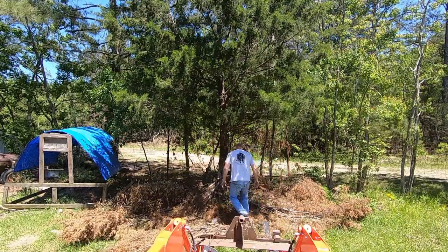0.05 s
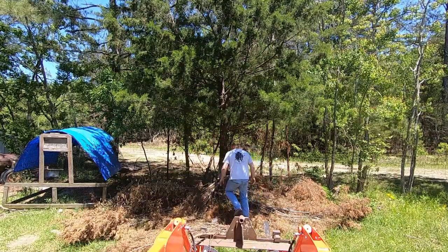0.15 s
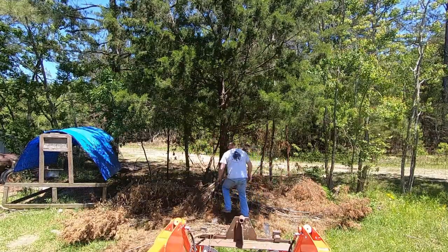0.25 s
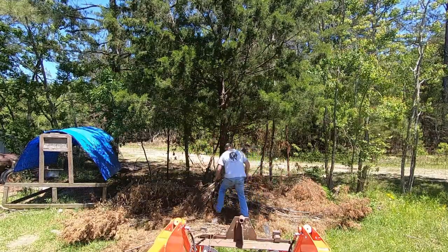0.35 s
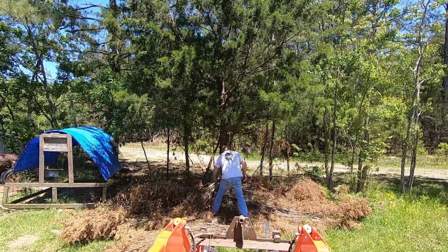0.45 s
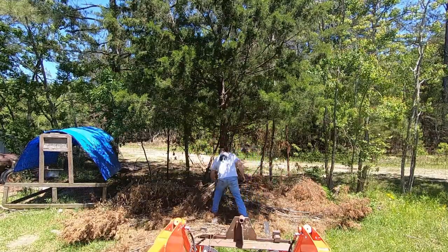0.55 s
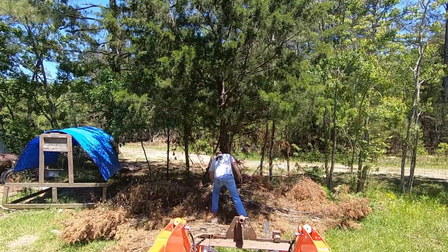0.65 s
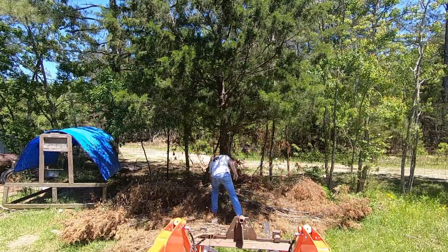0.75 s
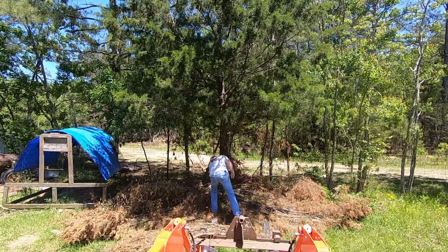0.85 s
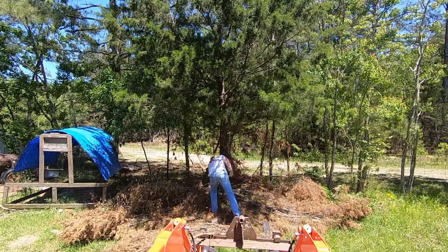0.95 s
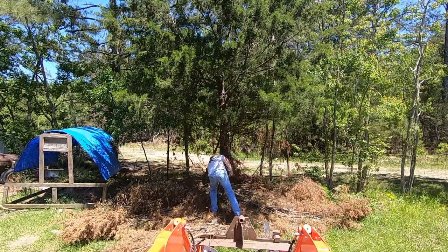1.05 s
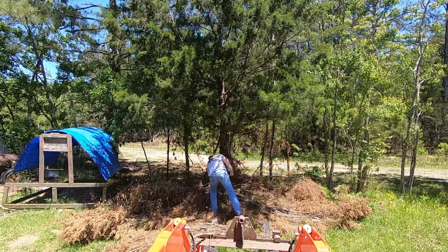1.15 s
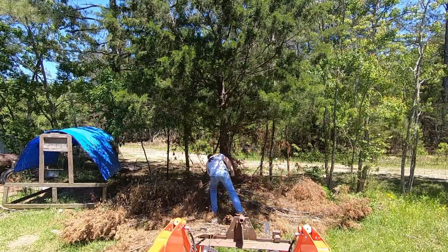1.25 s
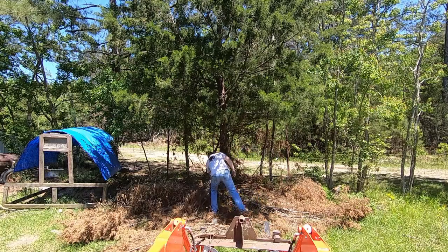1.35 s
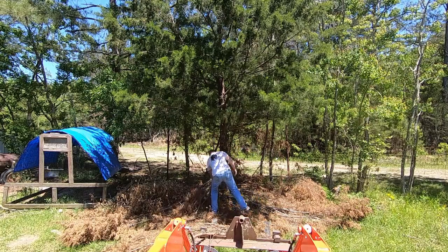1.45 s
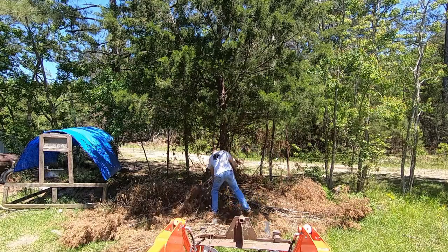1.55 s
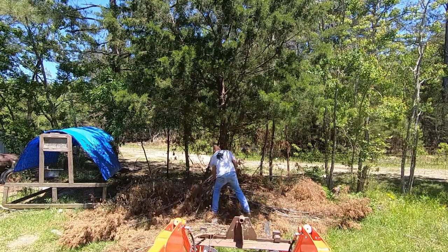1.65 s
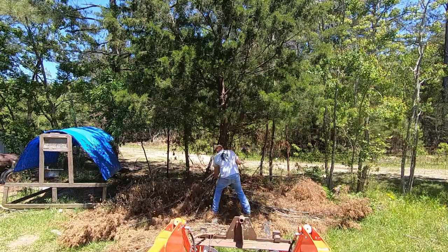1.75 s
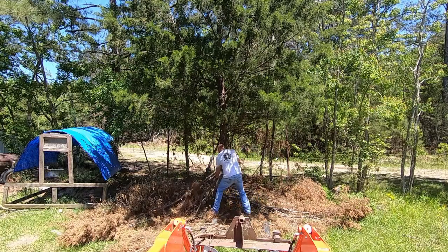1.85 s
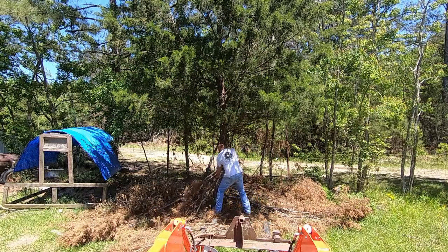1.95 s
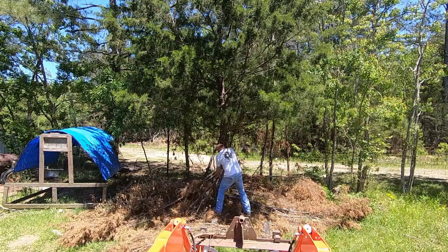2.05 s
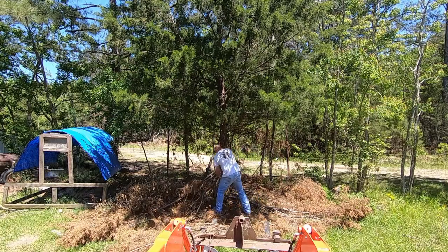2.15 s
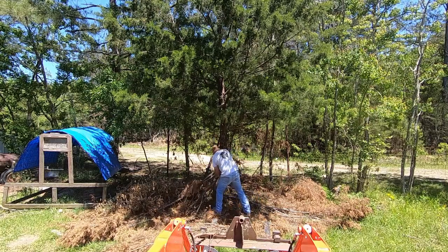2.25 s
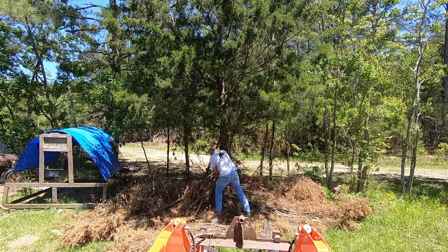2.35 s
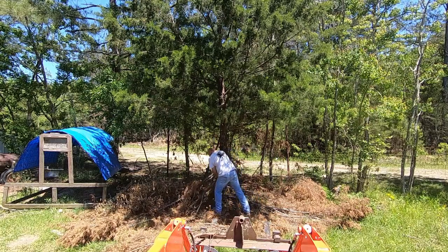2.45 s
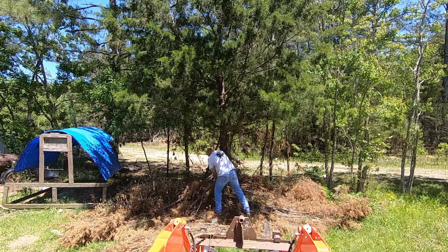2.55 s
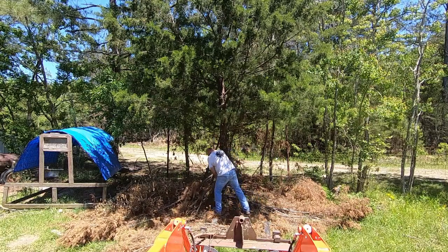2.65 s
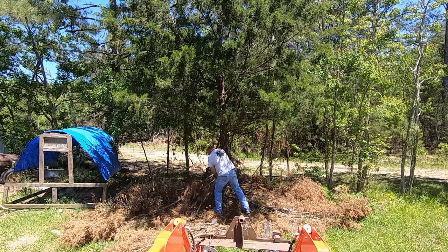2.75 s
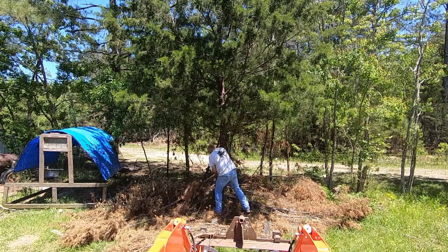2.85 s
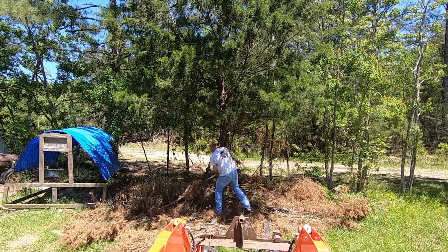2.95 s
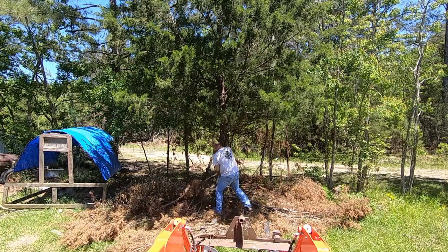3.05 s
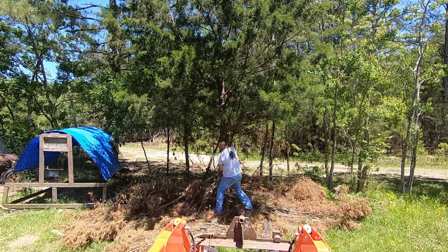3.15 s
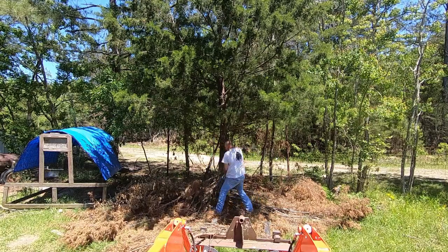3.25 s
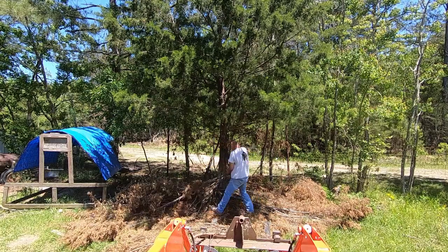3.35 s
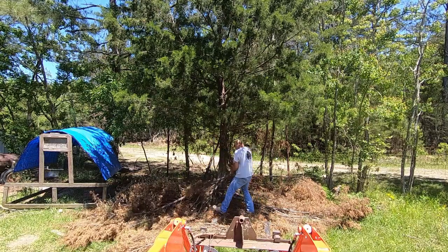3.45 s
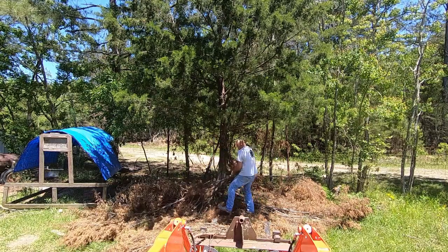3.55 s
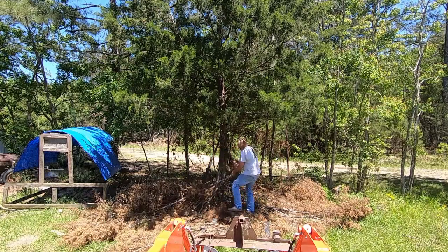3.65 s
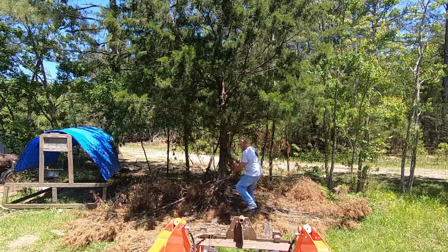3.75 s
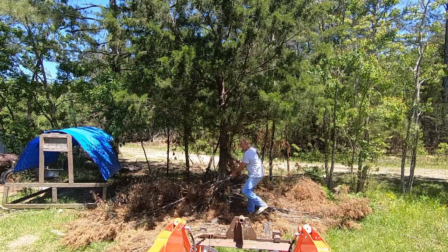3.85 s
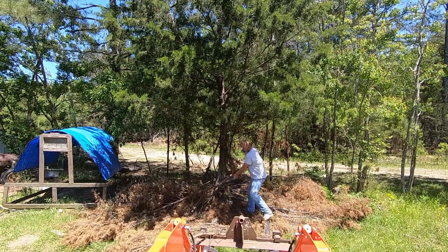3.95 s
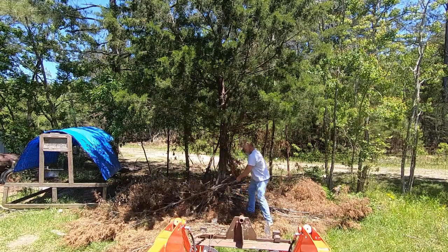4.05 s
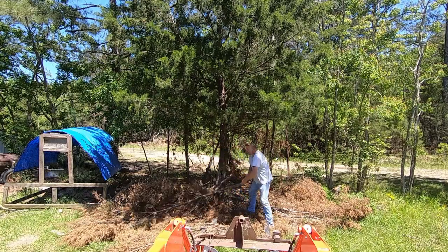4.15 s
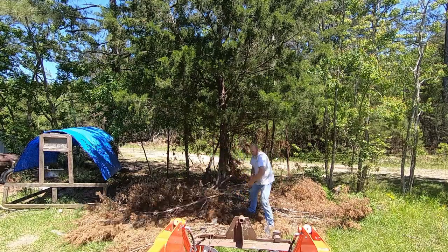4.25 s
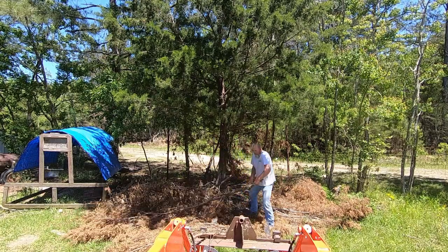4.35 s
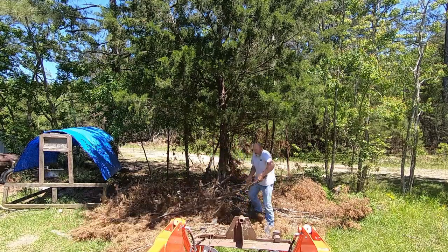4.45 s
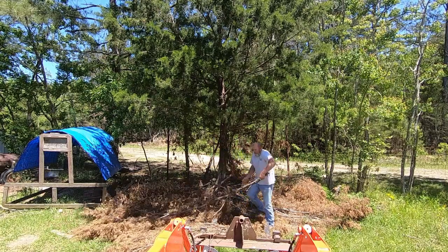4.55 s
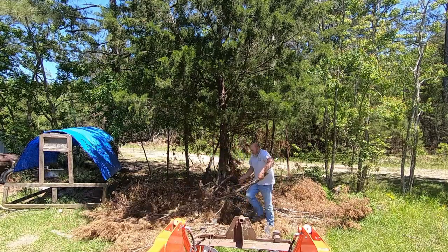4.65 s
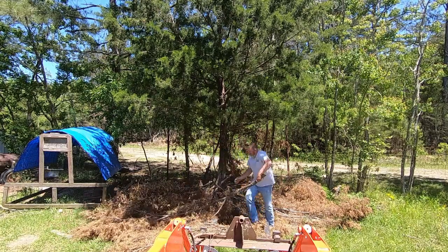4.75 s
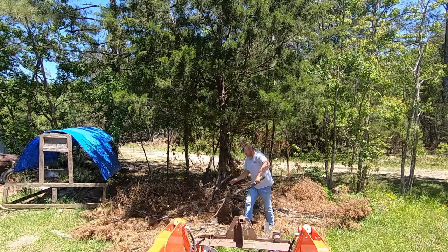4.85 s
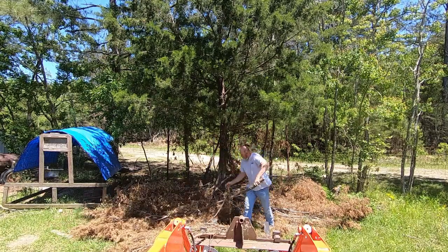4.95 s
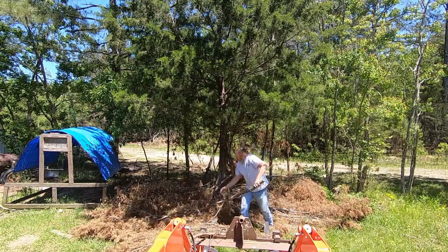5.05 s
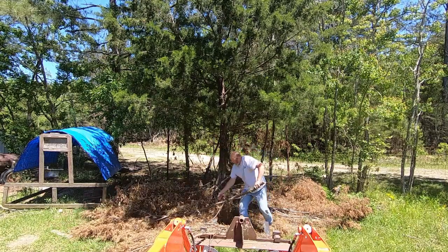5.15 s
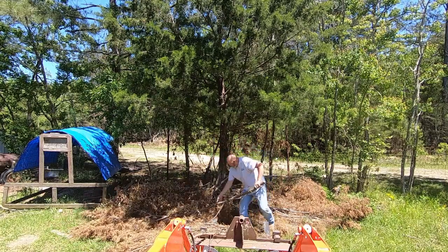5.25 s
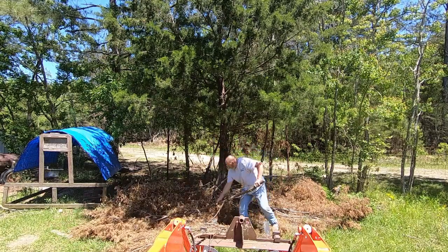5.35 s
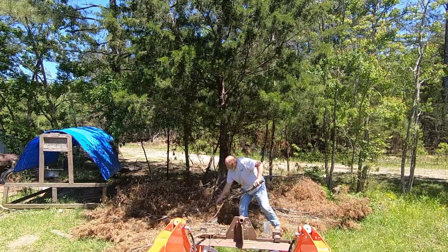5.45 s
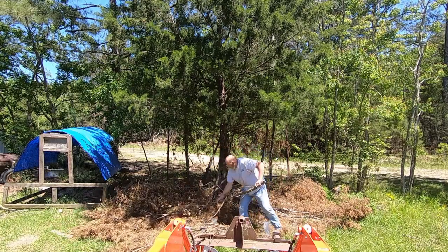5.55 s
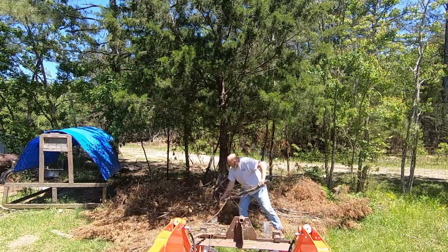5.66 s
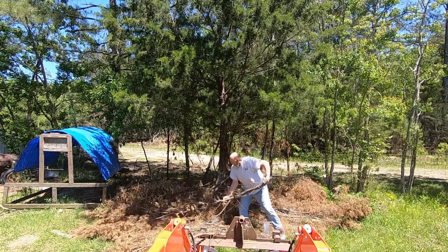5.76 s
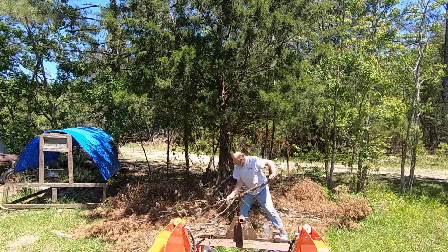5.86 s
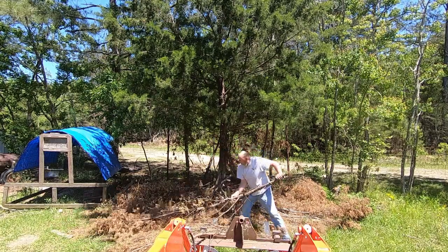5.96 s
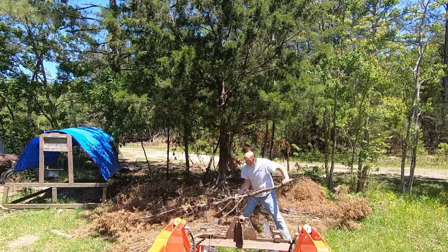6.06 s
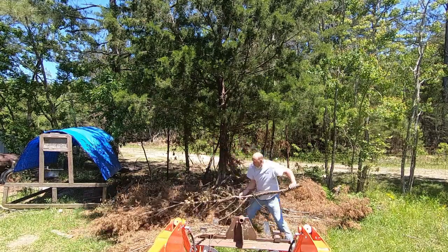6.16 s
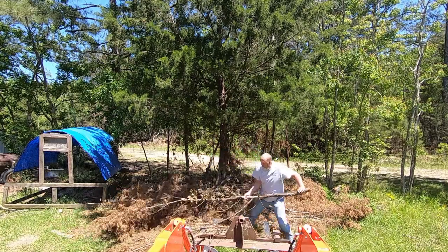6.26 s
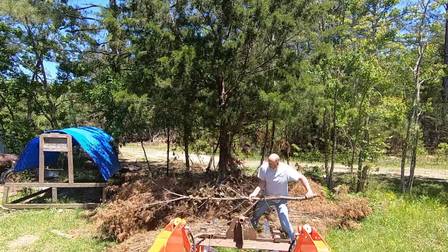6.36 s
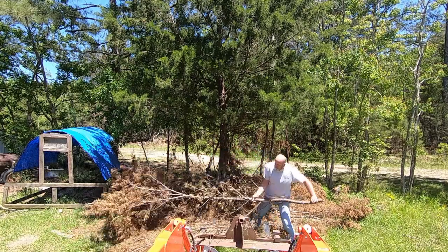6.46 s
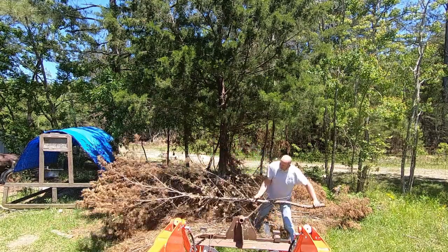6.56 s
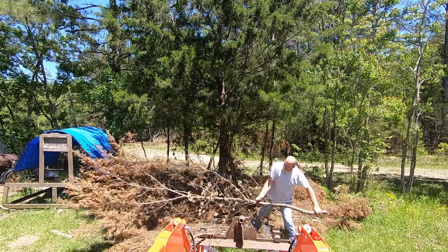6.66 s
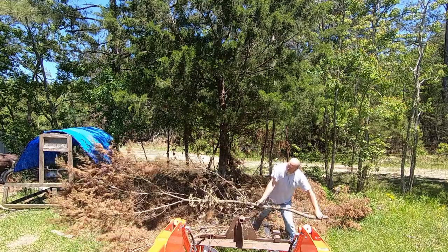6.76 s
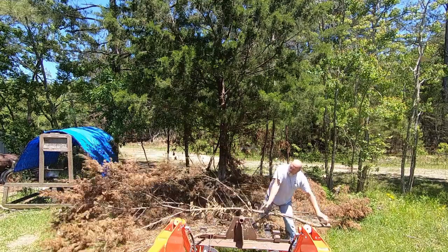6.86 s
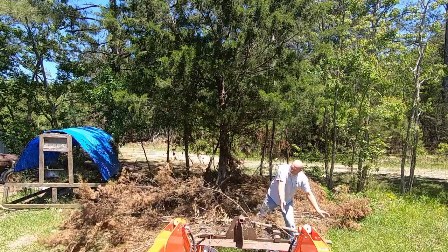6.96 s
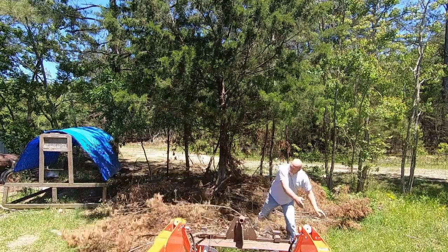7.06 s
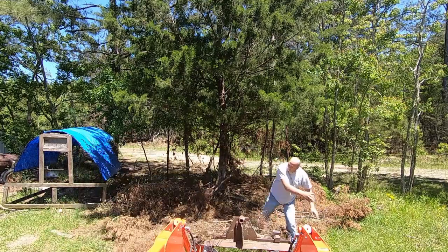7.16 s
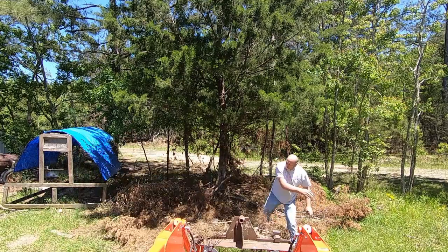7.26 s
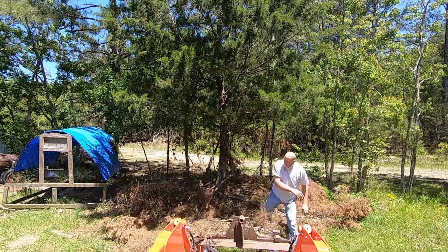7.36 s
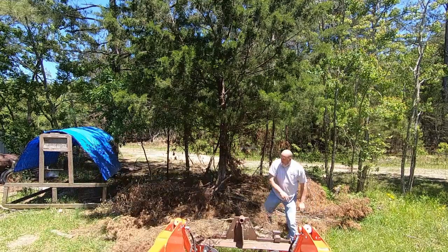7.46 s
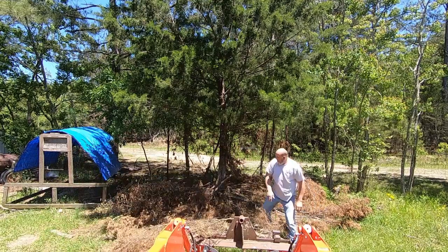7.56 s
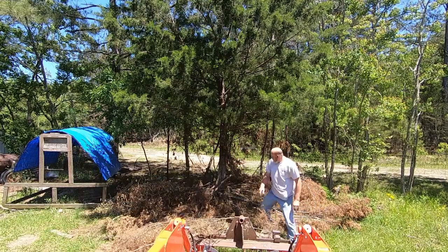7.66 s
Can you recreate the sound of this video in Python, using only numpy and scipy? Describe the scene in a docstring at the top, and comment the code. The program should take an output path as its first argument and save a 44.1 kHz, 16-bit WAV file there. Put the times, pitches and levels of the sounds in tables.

```python
"""A springy mount under a camera sways and rumbles throughout (low sines, coloured noise), over faint air noise.
From the start needled branches are dragged off a brush pile in pulls (needles and sticks: filtered clicks and noise),
with twig snaps and, up to 5 s, boot thuds (noise bursts). A far bird calls at 0.5-0.9 s (swept sines with echoes).
A branch knocks the steel frame at 6.0 s, lightly at 6.7 s and again at 7.15 s (decaying modes, bark noise).
The mount's joint pops from 6.2 s (pushed resonances) and squeaks at 7.4 s (three partials)."""
import sys
import numpy as np
from scipy import signal
from scipy.fft import rfft, irfft, next_fast_len
from scipy.io import wavfile
from scipy.ndimage import uniform_filter1d

SR = 44100
rng = np.random.default_rng(int(sys.argv[2]) if len(sys.argv) > 2 else 0)


def int16_out(signal):
    """Quantize to a 16-bit WAV file."""
    q = np.round(np.clip(np.atleast_2d(signal).T, -1, 1) * 32767)
    wavfile.write(sys.argv[1], SR, q.astype(np.int16))


N = 340525
T = np.arange(N) / SR

# air noise spectrum: f/Hz, relative density/dB
AIR_SHAPE = [(35, -39), (60, -18), (71, -18), (152, -8.5), (299, -9), (433, -10), (1210, -25), (2480, -18),
             (6140, -22), (9560, -54), (15600, -47)]
AIR_DB = -75.5

# bird notes: start t/s, length/s, first f/Hz, last f/Hz, warble depth/Hz, level/dB
BIRD_NOTES = [(.46, 0.08, 3900, 4070, 200, -66), (0.534, 0.061, 3950, 3190, 80, -60),
              (0.584, 0.056, 3700, 2740, 150, -62), (0.637, 0.062, 3500, 2730, 200, -65),
              (0.686, 0.052, 3500, 2914, 200, -64), (0.742, 0.062, 3450, 2950, 200, -68),
              (.80, .07, 3280, 3220, 60, -71)]
WARBLE_HZ = 69
WOOD_T60_S, WOOD_WET_DB = 0.96, 1.5

# footfalls on litter: t/s, peak level/dB, pitch f/Hz
FOOTFALLS = [(0.088, -56, 277), (0.705, -56, 221), (1.371, -59, 223), (1.991, -65, 221), (2.994, -50, 525),
             (4.258, -41, 598), (4.927, -54, 307), (5.039, -55, 409)]

# mount motion, before random wander: t/s, sway level/dB, shaking level/dB, rumble level/dB
MOUNT_LEVELS = [(0.05, -34, -45, -68), (0.15, -29, -47.5, -61), (0.32, -34.5, -57, -70),
                (0.73, -29.5, -57, -61), (0.81, -29.5, -56, -69), (1.15, -42, -57, -70.5),
                (1.47, -39, -73, -72.5), (1.9, -36.5, -60, -65), (1.98, -36.5, -65, -67.5),
                (2.28, -50, -59, -81), (2.43, -40, -69, -75.5), (3.0, -40.5, -59, -71.5),
                (3.36, -52, -74, -71), (3.79, -40.5, -65, -73), (4.38, -51, -69, -73),
                (4.53, -36, -54, -70), (4.91, -35.5, -60, -79), (5.11, -46, -52, -71.5),
                (5.19, -41.5, -62, -75), (5.89, -45.5, -63, -75.5), (6.06, -39.5, -38.5, -53.5),
                (6.87, -25.5, -40.5, -60.5), (6.98, -33.5, -40.5, -68), (7.15, -30.5, -45, -64),
                (7.19, -33, -33, -47), (7.27, -17.5, -36, -54), (7.34, -12.5, -27, -47),
                (7.51, -23, -28, -40), (7.55, -15.5, -30, -52), (7.68, -15, -36, -44)]
# mean sway rate: t/s, f/Hz
SWAY_RATE = [(0, 8.7), (4.25, 9.2), (4.45, 3.28), (5.45, 3.2), (5.7, 8.5), (7.72, 12.7)]
# dull pops in the mount's joint: t/s, peak level/dB, push length/ms
JOINT_POPS = [(6.191, -46, 8), (6.5, -48, 9.4), (6.71, -52, 7), (7.33, -46, 3.4), (7.422, -44, 1.47),
              (7.487, -25.5, 0.73), (7.633, -38, 1.4)]
SHUDDER_DB, BUZZ_DB = -1, -10.5  # mean shares of the shaking

# joint grips: start t/s, length/s, level before fade/dB
SQUEAK_GRIPS = [(7.4, 0.017, -41.5), (7.419, 0.034, -51)]
# squeak partials: f/Hz, relative level/dB
SQUEAK_TONES = [(2970, 0), (5830, -5), (8730, -20)]
SQUEAK_ATTACK_S, SQUEAK_FADE_DB_PER_S, SQUEAK_ROUGH_DB = 0.0035, 150, 2.5

# knocks on the frame: t/s, ring peak level/dB, favoured f/Hz, share of free ring time/0-1, bark crunch peak level/dB
FRAME_KNOCKS = [(5.994, -33, 1050, 0.95, -49), (6.0, -27.5, 380, 0.75, -33.5), (6.036, -36.5, 800, 1, -42),
                (6.669, -51.5, 400, 0.4, -60), (7.146, -41, 485, 0.3, -34), (7.153, -43, 1520, 0.2, -30.5),
                (7.185, -41, 473, 1, -36.5)]
# frame modes: f/Hz, relative level/dB, free t60/s
FRAME_MODES = [(218, -12.5, 0.76), (380, 0.5, 0.14), (482, 5, 0.072), (610, -9.5, 0.35), (728, -2, .1),
               (1014, 5, 0.16), (1250, -10, .12), (1510, -12, 0.071), (1940, -4, 0.078), (2350, -17, .06)]
CONTACT_RISE_S, SPOT_DB_PER_OCTAVE2 = 0.0044, 11.6

# twig snaps: t/s, wood level/dB, wood pitch f/Hz, splinter peak level/dB
TWIG_SNAPS = [(0.061, -57, 743, -53), (0.087, -60, 635, -59), (0.994, -59, 1520, -54),
              (1.096, -55.5, 667, -56), (1.369, -51, 725, -45), (1.678, -41, 1330, -51),
              (1.778, -42, 1600, -52), (1.86, -52, 784, -38), (2.133, -58, 1030, -48),
              (2.146, -54, 1350, -40), (2.458, -57.5, 684, -54), (2.988, -52, 2400, -44),
              (3.323, -41, 2090, -28), (3.989, -44, 2800, -40), (4.162, -30.5, 1300, -44),
              (4.18, -35.5, 1550, -44), (4.234, -36, 2730, -42), (4.246, -34, 1300, -35),
              (5.002, -55, 2100, -45), (6.332, -48, 2740, -39), (6.674, -48, 603, -44),
              (6.95, -68, 651, -45), (7.015, -54, 2570, -38), (7.529, -44.5, 643, -57)]
SNAP_T60_S, SNAP_RING_T60_S, SPLINTER_T60_S = 0.035, 0.068, 0.083

# pulls, before jerks: t/s, needle rustle level/dB, stick scrape minus rustle level/dB
PULL_LEVELS = [(0.03, -75, 4.5), (0.37, -80, 0.5), (0.58, -73.5, 3), (0.84, -76, -2.5), (1.21, -71, -5),
               (1.27, -62.5, -6), (1.36, -58, -7), (1.5, -55.5, -7), (1.84, -49.5, -15), (2.0, -48, -8),
               (2.16, -53, -14), (2.29, -67, -10.5), (2.55, -69, -6.5), (2.76, -55.5, -9),
               (2.99, -47.5, -10), (3.12, -45, -11), (3.29, -47.5, -11.5), (3.53, -38, -11.5),
               (3.76, -56, -9), (3.83, -59, -10), (3.98, -50, -9), (4.19, -40.5, -12), (4.4, -38.5, -9.5),
               (4.53, -42.5, -9.5), (4.66, -47, -9.5), (4.79, -54.5, -9.5), (5.36, -68.5, -5.5),
               (5.43, -64, -18), (5.46, -70, -3), (5.52, -69.5, -4), (5.62, -62, -9.5), (5.77, -42, -12),
               (5.98, -45, -11), (6.08, -47.5, -10.5), (6.22, -49, -9), (6.41, -43.5, -18),
               (6.47, -51.5, -10), (6.79, -62, -7.5), (6.94, -56.5, -11), (7.03, -49.5, -11),
               (7.12, -49, -6.5), (7.24, -46, -5), (7.33, -55.5, -7), (7.45, -59.5, 0), (7.5, -70, 3),
               (7.58, -66, 0.5)]
# branch jerks free: t/s, jump level before settling/dB
BRANCH_JERKS = [(0.91, 6.5), (1.38, 1.5), (1.85, 0.5), (1.96, 1.5), (2.81, 5), (3.03, 6), (3.33, 5),
                (3.39, 3.5), (3.848, 3), (3.99, 2.5), (5.375, 10.5), (6.23, 5.5), (6.33, 2), (6.95, 2),
                (7.15, 5)]
JERK_RISE_S, JERK_SETTLE_S = 0.0027, 0.06  # time constants
# needle hiss spectrum: f/Hz, relative density/dB
NEEDLE_SHAPE = [(1180, -14.5), (2000, -7.5), (2750, -4.5), (3630, -3), (4380, -2), (5900, -4.5), (8010, 1),
                (10500, -6.5), (13600, -67), (22000, -120)]
# finest needle hiss spectrum: f/Hz, relative density/dB
FINE_SHAPE = [(6180, -24.5), (10500, -17), (11200, 1.5), (13300, 6), (15600, -0.5)]
# mean finest hiss minus rustle, more as the branch swings near: t/s, level/dB
FINE_LEVEL = [(0, -8), (5.4, -6.5), (6.4, -4.5), (7.2, -3.5), (7.45, -16)]
# stick scrape spectrum: f/Hz, relative density/dB
STICK_SHAPE = [(400, -34), (800, -9), (1300, -2), (2000, -2.5), (3200, -7), (6000, -29)]
# low grind spectrum: f/Hz, relative density/dB
GRIND_SHAPE = [(180, -3), (300, -5.5), (500, -2.5), (800, -9), (1500, -23)]
# mean low grind at a hard scrape: t/s, level/dB
GRIND_LEVEL = [(0, -60.5), (.7, -58), (1.2, -66), (2, -60.5), (3.1, -69), (4.1, -63), (4.7, -69), (5, -62),
               (5.3, -65), (5.9, -70), (6.05, -52.5), (6.3, -60.5), (6.75, -54.5), (7, -59.5), (7.3, -55),
               (7.72, -54)]
GRIND_DB_PER_SCRAPE_DB, HARD_SCRAPE_DB = 0.43, -49

TOP_HZ = 15620


def undb(db):
    """Amplitude of a level in dB."""
    return 10 ** (np.asarray(db) / 20)


def unit(x):
    """Scale to rms 1."""
    return x / np.sqrt(np.mean(x ** 2))


def curves(table):
    """Columns of a table joined by straight lines in time."""
    t_s, *columns = np.transpose(table)
    return [np.interp(T, t_s, column) for column in columns]


def colour(x, points):
    """Filter by an (f/Hz, dB) shape, straight on a log-frequency axis; rms 1."""
    hz, db = np.transpose(points)
    size = next_fast_len(len(x))
    f_hz = np.arange(size // 2 + 1) * SR / size + 1e-3  # offset avoids log(0)
    gain = undb(np.interp(np.log(f_hz), np.log(hz), db))
    return unit(irfft(rfft(x, size) * gain, size)[:len(x)])


def band(x, lo_hz, hi_hz, order=2):
    """Butterworth bandpass."""
    edges_hz = [lo_hz, min(hi_hz, .45 * SR)]
    return signal.sosfilt(signal.butter(order, edges_hz, "bandpass", fs=SR, output="sos"), x)


def walk(rate_hz):
    """Random levels held 1 / rate and smoothed twice; rms 1."""
    k = int(SR / rate_hz)
    held = np.repeat(rng.standard_normal(N // k + 1), k)
    return unit(uniform_filter1d(uniform_filter1d(held, k), k)[:N])


def crackle(rate_hz, scatter_db):
    """Random clicks, most small and a few large; rms 1."""
    hit = rng.random(N) < rate_hz / SR
    size = np.minimum(rng.exponential(size=N), 5)
    return unit(hit * rng.choice([-1, 1], N) * undb(scatter_db * size))


def ring(hz, t60_s, seconds):
    """One decaying mode."""
    t = np.arange(int(seconds * SR)) / SR
    return np.sin(2 * np.pi * hz * t) * np.exp(-np.log(1000) * t / t60_s)


def burst(lo_hz, hi_hz, t60_s):
    """A sharp decaying noise burst in a band, cut at 80 ms; peak 1."""
    t = np.arange(int(.08 * SR)) / SR
    decay = np.exp(-np.log(1000) * t / max(t60_s, .002))
    x = band(rng.standard_normal(len(t)) * decay, lo_hz, hi_hz)
    return x / np.abs(x).max()


def add(out, t_s, x):
    """Mix x into out from t_s on."""
    i = int(t_s * SR)
    out[i:i + len(x)] += x[:N - i]


def air():
    """Coloured noise whose level wanders slightly."""
    return undb(AIR_DB + 0.8 * walk(3.3)) * colour(rng.standard_normal(N), AIR_SHAPE)


def bird():
    """Gliding, warbled whistles, most falling, smeared by echoes among the trees."""
    out, warble = np.zeros(N), np.sin(2 * np.pi * WARBLE_HZ * T)
    for t_s, length_s, first_hz, last_hz, warble_hz, db in BIRD_NOTES:
        u = np.linspace(0, 1, int(length_s * SR))
        hz = first_hz + (last_hz - first_hz) * u + warble_hz * warble[int(t_s * SR):][:len(u)]
        whistle = np.sin(2 * np.pi * np.cumsum(hz) / SR)
        add(out, t_s, undb(db) * np.sin(np.pi * u) * whistle)
    t = np.arange(SR) / SR
    trees = rng.standard_normal(SR) * np.exp(-np.log(1000) * t / WOOD_T60_S)
    echoes = signal.fftconvolve(out, trees / np.linalg.norm(trees))[:N]
    return out + undb(WOOD_WET_DB) * echoes


def steps():
    """A boot lands on soft ground: a short dull thud."""
    out = np.zeros(N)
    for t_s, db, hz in FOOTFALLS:
        add(out, t_s, undb(db) * burst(hz / 1.84, hz * 1.11, t60_s=0.037))
    return out


def pops():
    """Each smooth push excites four damped resonances of the loaded joint."""
    out = np.zeros(N)
    joint = 1.37 * ring(176, 0.055, .08) + 2.4 * ring(440, 0.0089, .08)
    joint = joint + 1.1 * ring(710, 0.0051, .08) + 0.74 * ring(1260, 0.0074, .08)
    for t_s, db, push_ms in JOINT_POPS:
        pop = np.convolve(np.hanning(int(push_ms * SR / 1000) + 3), joint)
        add(out, t_s, undb(db) * pop / np.abs(pop).max())
    return out


def mount():
    """The camera sways on its spring, shudders in two stiffer modes and rumbles, each in fits; the joint pops."""
    sway_db, shake_db, rumble_db = curves(MOUNT_LEVELS)
    sway_hz = curves(SWAY_RATE)[0] * (1 + 0.1012 * walk(9.1))
    sway = np.sqrt(2) * np.sin(2 * np.pi * (np.cumsum(sway_hz) / SR + rng.random()))
    # shapes: f/Hz, relative density/dB
    shudder = colour(rng.standard_normal(N), [(10, -38), (16, 3), (20, 22), (26, 8.5), (36, -45.0)])
    buzz = colour(rng.standard_normal(N), [(22, -44), (31, -6.0), (36, 24), (44, -39.0), (60, -56), (90, -63)])
    rumble = colour(rng.standard_normal(N), [(35, -17), (55, 0.5), (80, -2.5), (120, -9), (220, -18.5),
                                             (500, -33), (1200, -65)])
    shaking = undb(SHUDDER_DB + 4.8 * walk(6.1)) * shudder + undb(BUZZ_DB + 4.1 * walk(7)) * buzz
    out = undb(sway_db + 2.3 * walk(7)) * sway
    out = out + undb(shake_db) * shaking
    out = out + undb(rumble_db + 2.9 * walk(10)) * rumble
    return out + pops()


def squeak():
    """Each grip of the joint sings one pitch with two overtones, roughened, fading until it slips."""
    out = np.zeros(N)
    for t_s, length_s, db in SQUEAK_GRIPS:
        t = np.arange(int(length_s * SR)) / SR
        chatter = walk(290)[:len(t)]
        edges = np.clip(np.minimum(t, length_s - t) / SQUEAK_ATTACK_S, 0, 1)
        tone = sum(undb(g) * np.sin(2 * np.pi * hz * t) for hz, g in SQUEAK_TONES)
        level = undb(db - SQUEAK_FADE_DB_PER_S * t + SQUEAK_ROUGH_DB * chatter)
        add(out, t_s, np.sqrt(2) * level * edges * tone)
    return out


def frame():
    """Every knock rings the same modes, most those near the spot's pitch; wood meets steel softly, bark crunches."""
    out = np.zeros(N)
    contact = 1 - np.exp(-np.arange(SR // 2) / SR / CONTACT_RISE_S)
    for t_s, db, spot_hz, free, crunch_db in FRAME_KNOCKS:
        modes = 0
        for hz, mode_db, t60_s in FRAME_MODES:
            gain = undb(mode_db - SPOT_DB_PER_OCTAVE2 * np.log2(hz / spot_hz) ** 2)
            modes = modes + gain * ring(hz, free * t60_s, .5)
        sound = contact * modes
        add(out, t_s, undb(db) * sound / np.abs(sound).max())
        add(out, t_s, undb(crunch_db) * burst(310, 1800, t60_s=0.12))
    return out


def twigs():
    """Each snap is a woody crack around its pitch with a spray of splinters on top."""
    out = np.zeros(N)
    for t_s, db, hz, splinter_db in TWIG_SNAPS:
        crack = burst(hz / 3.4, hz * 2.1, SNAP_T60_S)
        wood_ring = burst(hz / 1.14, hz * 1.18, SNAP_RING_T60_S)
        splinters = burst(4200, 11800, SPLINTER_T60_S)
        add(out, t_s, undb(db) * (crack + 0.45 * wood_ring) + undb(splinter_db) * splinters)
    return out


def jerks():
    """Each jerk lifts the level quickly, in dB, and lets it settle."""
    t_s, jump_db = np.transpose(BRANCH_JERKS)
    after_s = np.maximum(T - t_s[:, None], 0)
    return jump_db @ ((1 - np.exp(-after_s / JERK_RISE_S)) * np.exp(-after_s / JERK_SETTLE_S))


def rubbing(rate_hz, scatter_db, shared, patchy_db, flicker_db):
    """Countless small contacts: half octaves have own and shared clicks plus noise, and come in patches."""
    common = crackle(rate_hz, scatter_db)
    surge = unit(walk(10) + 1.55 * walk(40))
    out = 0
    for hz in 177 * 2 ** np.arange(0, 6.6, .5):
        clicks = shared * common + crackle(rate_hz, scatter_db) + 0.48 * rng.standard_normal(N)
        part = band(clicks, hz / 2 ** .25, hz * 2 ** .25)
        out = out + part * undb(patchy_db * surge + flicker_db * walk(25.03))
    return out


def pile():
    """Needles hiss over each other while sticks scrape and grind underneath."""
    rustle_db, sticks_db = curves(PULL_LEVELS)
    rustle_db = rustle_db + jerks()
    scrape_db = rustle_db + sticks_db
    fine_db = curves(FINE_LEVEL)[0] + 1.15 * walk(8.8)
    grind_db = curves(GRIND_LEVEL)[0] + GRIND_DB_PER_SCRAPE_DB * (scrape_db - HARD_SCRAPE_DB) + 3 * walk(8.1)
    needles = rubbing(5000, scatter_db=2.5, shared=0.28, patchy_db=1.02, flicker_db=0.8)
    sticks = rubbing(900, scatter_db=2.5, shared=0.83, patchy_db=1.03, flicker_db=2.5)
    hiss = colour(needles, NEEDLE_SHAPE) + undb(fine_db) * colour(needles, FINE_SHAPE)
    scrape = undb(scrape_db) * colour(sticks, STICK_SHAPE)
    grind = undb(grind_db) * colour(sticks, GRIND_SHAPE)
    return undb(rustle_db) * hiss + scrape + grind


def scene():
    """Sum of all sources, one channel."""
    return (air() + bird() + steps() + mount() + squeak() + frame() + twigs() + pile())[None]


def record(dry):
    """The camera cuts the top steeply: elliptic low-pass."""
    return signal.sosfilt(signal.ellip(12, .2, 90, TOP_HZ, fs=SR, output="sos"), dry)


dry = scene()
out = record(dry)
int16_out(out)
```